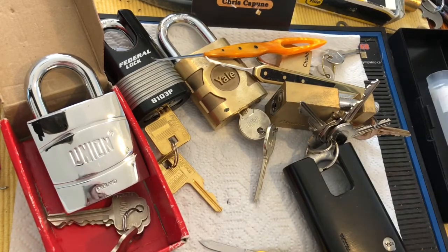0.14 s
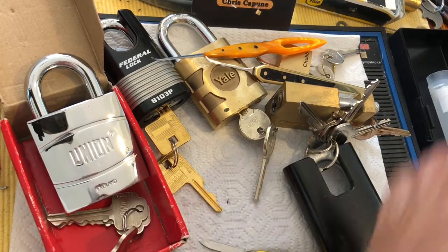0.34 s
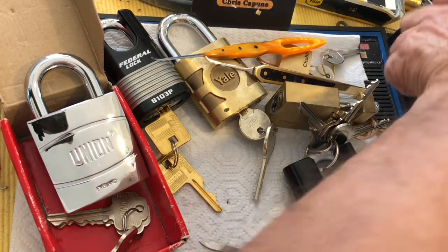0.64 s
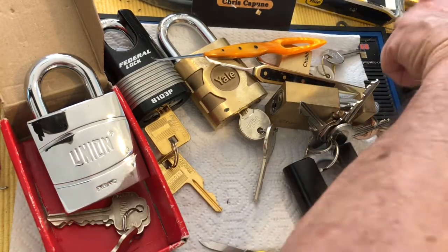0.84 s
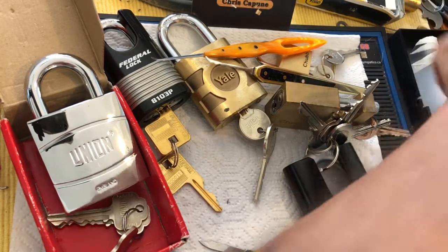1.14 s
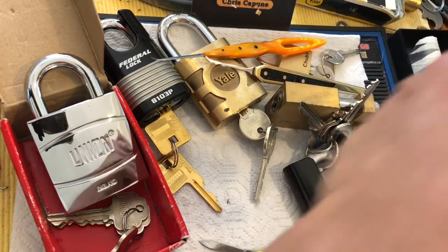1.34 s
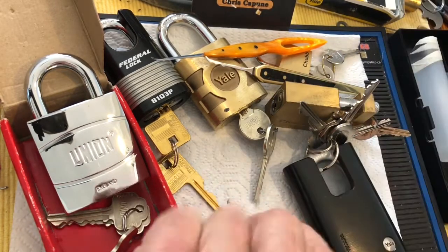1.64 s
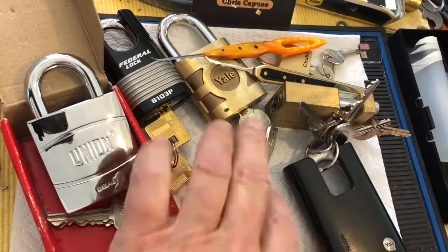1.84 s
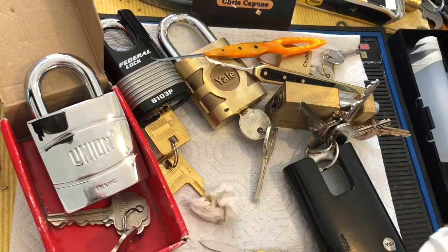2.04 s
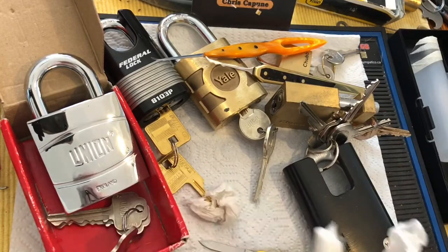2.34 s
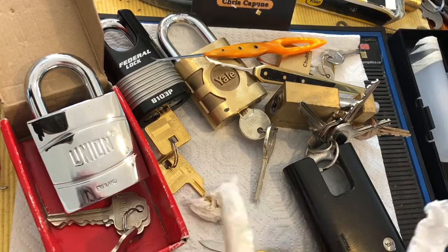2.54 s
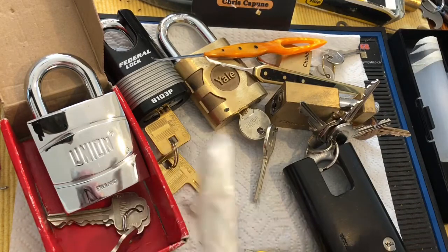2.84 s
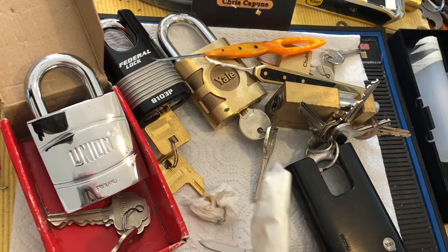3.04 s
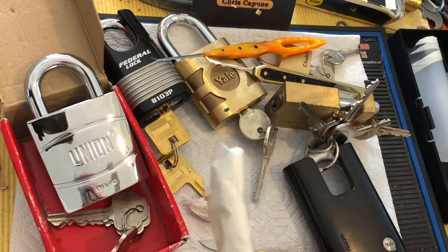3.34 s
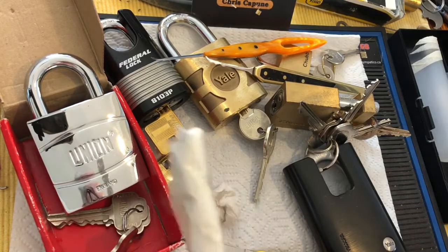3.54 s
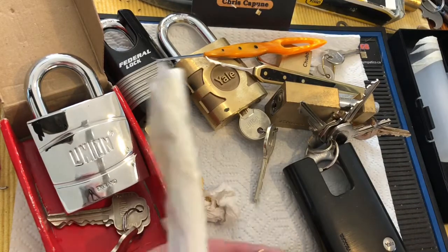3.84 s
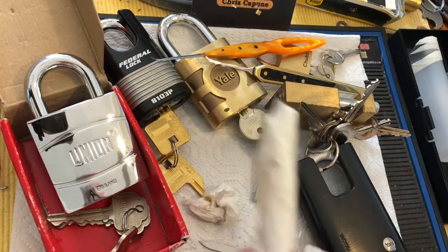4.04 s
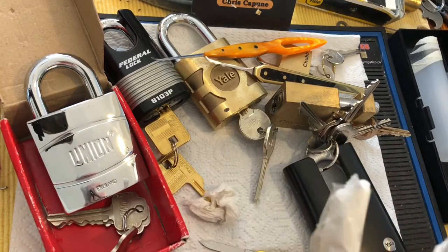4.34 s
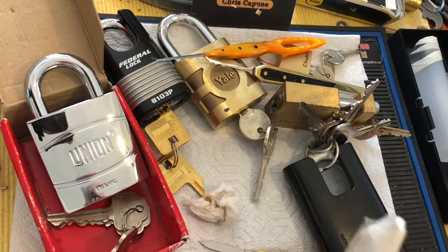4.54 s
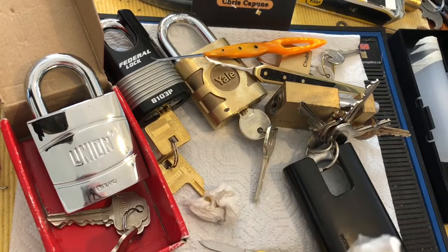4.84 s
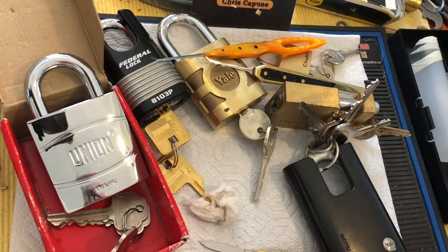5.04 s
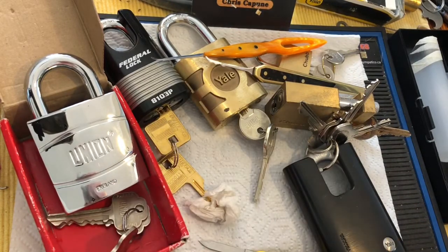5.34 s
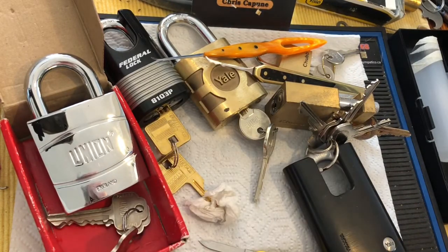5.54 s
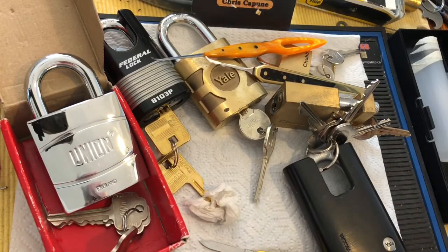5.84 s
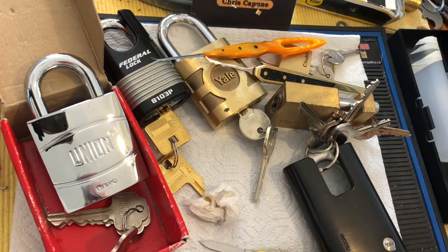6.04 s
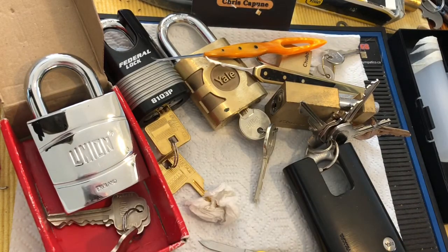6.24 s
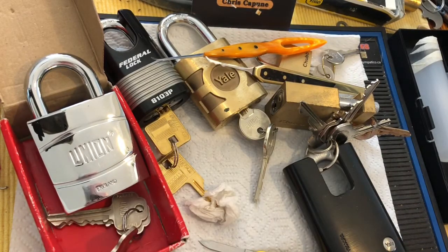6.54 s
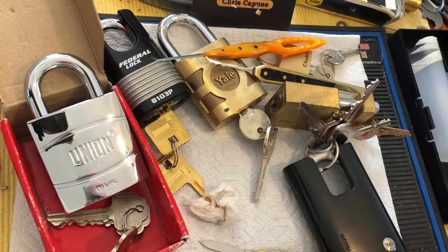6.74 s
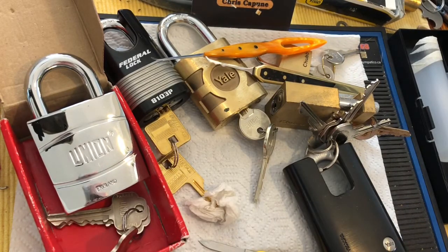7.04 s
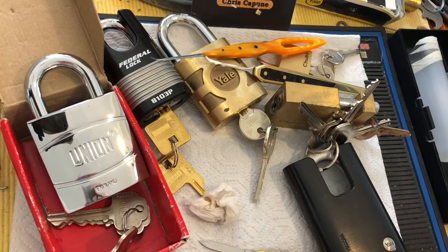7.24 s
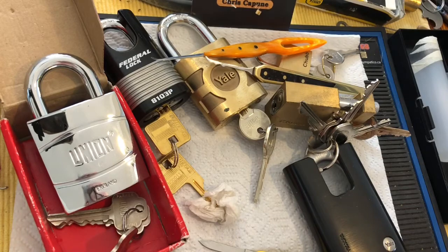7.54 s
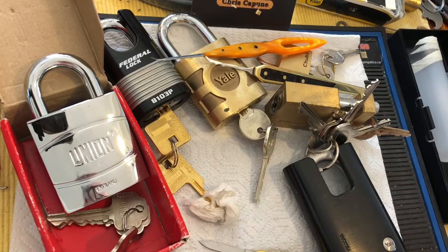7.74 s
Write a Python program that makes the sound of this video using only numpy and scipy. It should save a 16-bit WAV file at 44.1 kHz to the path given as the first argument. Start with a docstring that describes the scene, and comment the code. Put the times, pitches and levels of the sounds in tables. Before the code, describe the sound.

Close plastic clatter, then a burst of loud paper ripping and crackling, fading into dry finger rustles in a small humming room.

```python
"""A small room with a bench: close to the microphone, hands take thin paper from a plastic case.
The case clacks as ringing wall modes, a rattle, a hard crack and a hollow air note. The paper snaps as it is
torn and crumpled (short resonant bursts over fine crackle), then hisses as fingers rub and roll it (shaped noise).
A motor hums in sines that beat against the mains, over steady coloured room noise."""
import sys
import numpy as np
from scipy import signal
from scipy.fft import rfft, irfft, next_fast_len
from scipy.io import wavfile
from scipy.ndimage import uniform_filter1d, map_coordinates

SR = 44100
rng = np.random.default_rng(int(sys.argv[2]) if len(sys.argv) > 2 else 0)


def unload_audio(sound):
    """Save the sound as a 16-bit wav file, at the path given as the first command line argument."""
    columns = np.transpose(np.atleast_2d(sound))
    # keep every value between -1 and 1, then stretch to whole-number steps
    steps = np.round(np.clip(columns, -1, 1) * 32767)
    wavfile.write(sys.argv[1], SR, steps.astype(np.int16))


N = 347949


def amp(db):
    """Gain of a dB value."""
    return 10 ** (np.asarray(db) / 20)


def unit(x):
    """x at rms 1."""
    return x / np.sqrt(np.mean(x ** 2) + 1e-20)


def peaked(x):
    """x with its peak at 1."""
    return x / np.abs(x).max()


def along(points, hz):
    """Values at hz, read from (frequency, value) points on a log frequency axis."""
    point_hz, value = np.transpose(points)
    return np.interp(np.log(hz + 1), np.log(point_hz + 1), value)


def curves(rows):
    """One value per sample for each column after the time."""
    time, *columns = np.transpose(rows)
    return [np.interp(np.arange(N) / SR, time, column) for column in columns]


def wobble(rate):
    """A smooth random curve, rate knots a second."""
    knots = rng.standard_normal(int(N * rate / SR) + 4)
    return map_coordinates(knots, [np.arange(N) * rate / SR])


def filtered(x, response):
    """x times a response of frequency, with padding for the filter's tail."""
    size = next_fast_len(x.shape[-1] + 8192)
    spectrum = rfft(x, size) * response(np.fft.rfftfreq(size, 1 / SR))
    return irfft(spectrum, size)[..., :x.shape[-1]]


def coloured(x, spectrum):
    """x given a spectrum that falls away outside its points, rms 1."""
    closed = [(spectrum[0][0] * .9, -120), *spectrum, (spectrum[-1][0] * 1.01, -120)]
    return unit(filtered(x, lambda hz: amp(along(closed, hz))))


def resonance(centre_hz, width_hz):
    """A causal resonance applied twice, so that its flanks are steep."""
    return lambda hz: (1j * hz * width_hz / (centre_hz ** 2 - hz ** 2 + 1j * hz * width_hz)) ** 2


def snaps():
    """A break excites a rough ring of the buckled patch, a sharp edge and a flap; now and then a dull low knock
    sounds."""
    # creases that buckle and fibres that break: (time [s], nominal level [dB], ring frequency [Hz],
    # sharp edge [dB re ring], flap [dB re ring], decay t60 [s])
    snap_rows = [(.166, -20, 8150, -7.5, -12, 0.028), (0.216, -28.5, 3500, 4, -32, 0.015),
                 (0.4427, -37.5, 3120, -3.5, -23, 0.02), (0.924, -32, 7440, 2.5, -32, .015),
                 (1.3787, -38, 4930, -28, -29, 0.016), (1.909, -39, 5300, 12, -22, .01),
                 (2.0256, -37, 4230, -12, -10, 0.013), (2.0783, -39.5, 4330, 15, -18, 0.0074),
                 (2.1097, -13.5, 4630, -8.5, -7.5, 0.01), (2.133, -25, 5250, 4, -12, .014),
                 (2.148, -9, 6400, 0.5, -23, 0.011), (2.165, -15, 4330, -3, -6.5, 0.016),
                 (2.195, -20, 4170, 7.5, -14, 0.015), (2.199, -30, 5000, 2, -14, .01),
                 (2.215, -1.5, 5400, -6, -8.5, 0.015), (2.266, -17, 3120, 3, -10, 0.011),
                 (2.297, -32, 3100, -4.5, -19, .008), (2.381, -23, 4530, -5, -12, 0.013),
                 (2.3856, -27.5, 5000, -3.5, -20, .01), (2.3873, -17, 4130, -3.5, -14.5, 0.01),
                 (2.421, -27.5, 4000, -3, -9, 0.016), (2.472, -19, 3800, -4.5, -14, .011),
                 (2.5198, -17, 3060, 0.5, -18, 0.0082), (2.5207, -16.5, 4300, -5, -12, 0.0086),
                 (2.5244, -14, 3580, -6.5, -13, 0.018), (2.5344, -25.5, 4010, -6.5, -10, 0.014),
                 (2.549, -25, 4760, 5.5, -12, 0.017), (2.572, -27, 5500, 6.5, -21, 0.018),
                 (2.5761, -22.5, 4550, 8, -23, 0.019), (2.62, -33, 3350, 4, -6.5, 0.014),
                 (2.6967, -25, 4400, -15, -12, 0.0087), (2.8188, -25, 2900, -18.5, -6, 0.012),
                 (2.8881, -32.5, 3000, 1.5, -6, 0.016), (2.9888, -8.5, 3100, -14, -35, 0.0083),
                 (3.125, -37, 7100, 13, -22, 0.02), (3.307, -31, 3190, -9, -12, 0.011),
                 (3.8677, -23, 5470, -13.5, -24, 0.0095), (4.1075, -33.5, 5100, -10, -5.5, 0.011),
                 (4.132, -35.5, 7060, -1, -33.5, 0.0047), (4.828, -41, 5880, 13.5, -30.5, 0.0092),
                 (5.343, -34.5, 6080, 2.5, -31.5, 0.0073), (6.027, -34, 3600, 3, -11, .012),
                 (6.0535, -33, 3000, 6.5, -5, 0.019), (6.092, -40, 5500, 3, -25, .01),
                 (6.115, -34.5, 4370, 4, -3, 0.0077), (6.707, -37.5, 2200, -25, -27, 0.013),
                 (6.868, -33, 3760, 7, -30.5, 0.015), (7.1, -35, 6380, -20, -10.5, 0.028),
                 (7.649, -32, 6020, 5.5, -17, 0.0098), (7.741, -35.5, 4380, -1, -30, 0.008),
                 (7.838, -31.5, 6360, -22.5, -25, 0.011)]
    # dull low knocks among the snaps: (time [s], peak level [dB], frequency [Hz])
    pop_rows = [(2.195, -39, 910), (2.217, -34, 875), (2.523, -37, 870), (2.535, -41.5, 794),
                (2.817, -45.5, 505), (6.056, -46, 1000)]
    out, t = np.zeros(N + SR), np.arange(SR // 10) / SR

    for s, db, ring_hz, edge_db, flap_db, t60 in snap_rows:
        fade = amp(-60 * t / t60) * (1 - np.exp(-t / 0.0002))
        push = rng.standard_normal((3, len(t))) * fade
        push[:, 8] += (6, 7, 4.5)  # the instant of breaking: a spike into ring, edge and flap
        ring = peaked(filtered(push[0], resonance(ring_hz, ring_hz * 0.9)))
        edge = peaked(filtered(push[1], resonance(10000, 11000)))
        flap_hz = 1600 * np.exp(.08 * rng.standard_normal())
        flap = peaked(filtered(push[2], resonance(flap_hz, 750)))
        snap = ring + amp(edge_db) * edge + amp(flap_db) * flap
        out[round(s * SR):][:len(t)] += amp(db - 3.5) * snap

    for s, db, pop_hz in pop_rows:
        push = rng.standard_normal(len(t)) * amp(-60 * t / 0.018)
        pop = peaked(filtered(push, resonance(pop_hz, pop_hz * .7)))
        out[round(s * SR):][:len(t)] += amp(db) * pop
    return out[:N]


def crackle(count=700):
    """Small fibres break at random moments, each a tiny rough burst with its own colour and size."""
    # breaking fibres, strongest while the sheet tears: (time [s], nominal level [dB])
    fibre_levels = [(0, -61.5), (2.05, -63.5), (2.1, -42), (3.0, -47), (3.35, -57), (6, -58), (7.89, -60)]
    fibre_hz, fibre_t60_s, fibre_spread_db = 4950, 0.0073, 4
    t = np.arange(400) / SR
    when, size, pitch = rng.random((count, 3)).T
    start = (when * N).astype(int)
    size_db = curves(fibre_levels)[0][start] - fibre_spread_db * np.log(size + .02)  # a few far louder
    hz = fibre_hz * 4 ** (pitch - .5)  # spread over two octaves
    rough = uniform_filter1d(rng.standard_normal((count, len(t))), size=5, axis=1)
    fade = amp(size_db[:, None] - 60 * t / fibre_t60_s)
    bursts = rough * np.cos(2 * np.pi * hz[:, None] * t) * fade
    places = start[:, None] + np.arange(len(t))
    return np.bincount(places.ravel(), bursts.ravel(), N + len(t))[:N]


def patchy(x, patchy_db):
    """The contact wanders over the sheet, so the colour shifts in patches of time and frequency."""
    z = signal.stft(x, nperseg=256)[2]
    field = uniform_filter1d(rng.standard_normal(z.shape), size=8, axis=0)
    field = uniform_filter1d(field, size=14, axis=1)
    return signal.istft(z * amp(patchy_db * unit(field)), nperseg=256)[1][:N]


def rubbing():
    """Countless fibres catch and slip: noise whose strength jumps; one swell of it is the case's bright wash."""
    # hands resting on and shifting the paper: (time [s], hiss level [dB])
    contact_levels = [(0, -65), (.12, -68.5), (.34, -73), (.46, -71.5), (.62, -75.5), (.72, -75),
                      (1.1, -66.5), (1.5, -63), (1.76, -65), (2.05, -65.5), (3.3, -69.5), (4.05, -73),
                      (4.8, -75), (5.15, -61), (5.5, -60.5), (5.95, -65.5), (6.18, -68.5), (6.45, -71),
                      (7.3, -77), (7.89, -66)]
    # single strokes of the fingers; the one at 0.834 s is the bright wash after the case clacks:
    # (loudest time [s], hiss level [dB], rise [s], fall [s], cupped fold [dB re hiss])
    swell_rows = [(.012, -59, 0.025, 0.082, 1.5), (.174, -55, 0.022, 0.12, -30),
                  (0.834, -47, 0.014, 0.26, -33), (1.14, -57.5, 0.018, 0.14, -33),
                  (1.397, -75, 0.038, 0.14, -34), (1.66, -61, 0.034, 0.16, -28),
                  (1.868, -53.5, 0.052, 0.12, -18), (2.141, -47, 0.065, 0.2, -20),
                  (2.223, -45.5, 0.015, 0.15, -26), (2.389, -46.5, 0.076, 0.17, -25),
                  (2.528, -52, 0.058, 0.24, -25), (2.712, -54, 0.052, 0.15, -25),
                  (2.792, -45, 0.05, 0.075, -20), (2.995, -58.5, 0.16, 0.059, -30),
                  (3.141, -58, 0.074, 0.06, -30), (3.231, -56.5, 0.039, 0.21, -30),
                  (3.337, -49, 0.045, 0.028, -36), (3.49, -54, 0.17, 0.54, -36),
                  (3.66, -49.5, 0.18, 0.37, -14), (3.845, -52.5, 0.17, 0.046, -15),
                  (3.975, -53, 0.094, 0.066, -27), (4.101, -51.5, 0.011, 0.057, -16),
                  (4.19, -51, 0.06, 0.053, -28), (4.232, -55, 0.037, 0.022, -24.5),
                  (4.475, -61.5, .008, 0.31, -26), (4.564, -47, 0.014, 0.019, -15),
                  (4.615, -46.5, 0.029, 0.06, -29), (4.645, -52, 0.063, 0.041, -20),
                  (5.41, -53.5, 0.039, 0.064, -24), (5.68, -54, 0.33, 0.18, -30),
                  (5.915, -53, .1, 0.088, -30), (6.048, -54, 0.16, .12, -30),
                  (6.13, -63, 0.074, 0.033, -36), (6.492, -63.5, 0.029, 0.14, -24),
                  (6.665, -60, 0.031, 0.12, -29.5), (6.725, -51, 0.041, 0.083, -39),
                  (6.773, -51.5, 0.092, 0.022, -37), (7.005, -56.5, 0.061, 0.098, -26),
                  (7.04, -53, 0.083, 0.028, -31), (7.11, -63.5, 0.048, 0.085, -28.5),
                  (7.4, -64.5, .02, 0.051, -29), (7.58, -56, 0.12, 0.11, -25.5),
                  (7.635, -47.5, 0.08, 0.08, -19), (7.81, -55, 0.041, 0.12, -32)]
    # colour of the hiss: (frequency [Hz], relative level [dB])
    hiss_colour = [(800, -16.5), (1600, -4), (2800, -2.5), (3500, -0.5), (4800, 0), (7000, -2.5),
                   (10700, -9), (15200, -11.5), (15900, -9.5)]
    swell_db, roundness = 20.5, 1.22  # drop at the end of a rise or fall; power law of its shape
    fold_hz, fold_width_hz = 2000, 650
    # strong swells are brighter: sheen centre, level re a firm stroke, growth power, level of a firm stroke
    sheen_hz, sheen_db, sheen_grows, firm_db = 12000, -7, 1.5, -48

    t = np.arange(N) / SR
    grit = amp(0.41 * wobble(900) + 1.2 * wobble(120) + 0.25 * wobble(40))  # catches, clumps, uneven fingers
    slip = patchy(unit(grit * rng.standard_normal(N)), patchy_db=2.5)

    power, cupped = amp(2 * curves(contact_levels)[0]), np.zeros(N)
    for s, db, rise_s, fall_s, fold_db in swell_rows:
        away = np.abs(t - s) / np.where(t < s, rise_s, fall_s)
        swell = amp(2 * (db - swell_db * away ** roundness))  # doubled dB: swells add as power
        power = power + swell
        cupped = cupped + amp(2 * fold_db) * swell
    strength = np.sqrt(power)

    hiss = strength * coloured(slip, hiss_colour)
    fold = np.sqrt(cupped) * unit(filtered(slip, resonance(fold_hz, fold_width_hz)))
    bright = coloured(filtered(slip, resonance(sheen_hz, sheen_hz)), hiss_colour[2:])
    sheen = amp(sheen_db + firm_db) * (strength / amp(firm_db)) ** sheen_grows * bright
    return hiss + sheen + fold


def case():
    """Every knock rings the plastic walls at new strengths, the air inside, and shakes what lies there."""
    # the case is knocked and its lid bounces: (time [s], nominal level [dB], wall ring [dB re rattle],
    # hollow note [dB re nominal level], rattle t60 [s])
    clack_rows = [(0.735, -47.5, 10.5, -5.5, 0.015), (0.827, -0.5, -6.5, -25, 0.03),
                  (0.87, -30, 9, -10, 0.04), (0.9333, -16.5, -11, -31, 0.059),
                  (0.9367, -9, -1.5, -16.5, 0.048), (0.968, -11, -10, -9.5, 0.043),
                  (0.995, -23, -0.5, -6, 0.037)]
    # wall modes: (nominal frequency [Hz], relative level [dB], decay t60 [s])
    wall_modes = [(327, -14, 0.07), (424, -7, 0.046), (634, -2.5, 0.051), (943, -6.5, .05),
                  (1054, -10.5, 0.033), (1300, -0.5, 0.045), (1588, -4.5, 0.018), (2342, -1.5, 0.04),
                  (2620, -3, 0.025), (2740, -5, 0.032), (3138, -6.5, 0.022), (3640, -8.5, 0.019),
                  (4370, -11, .02), (5340, -13.5, 0.026)]
    # colour of the loose rattle: (frequency [Hz], relative level [dB])
    rattle_colour = [(150, -46), (250, -29.5), (1320, -1), (1660, -13), (2050, -5.5), (2280, -12),
                     (2530, -5.5), (4800, -12.5), (5800, -16), (10100, -16.5), (16500, -30)]
    # the air under the lid: (frequency [Hz], width [Hz], t60 of its noise drive [s])
    lid_air = (795, 75, 0.07)
    waver = 0.1  # phase drift of the wall modes, radians a sample
    thin_hz = 170  # the small case radiates little below this
    out, t = np.zeros(N + SR), np.arange(SR // 3) / SR
    hollow_hz, width_hz, drive_t60 = lid_air

    for s, db, ring_db, hollow_db, t60 in clack_rows:
        chance = rng.standard_normal((len(wall_modes), 2))
        ring = np.zeros(len(t))
        for (hz, level, mode_t60), (luck, detune) in zip(wall_modes, chance):
            drift = waver * np.cumsum(rng.standard_normal(len(t)))
            tone = np.sin(2 * np.pi * hz * (1 + 0.0076 * detune) * t + drift)
            fade = amp(level + np.clip(2.0 * luck, -4, 4) - 60 * t / mode_t60)
            ring += fade * tone * (1 - np.exp(-t * hz / 2.2))  # low modes take longer to build

        rattle = coloured(rng.standard_normal(len(t)), rattle_colour) * amp(-60 * t / t60)

        shaken = rng.standard_normal(len(t)) * amp(-60 * t / drive_t60)
        shaken[:40] += 3 * np.hanning(40)  # the lid pushes the air once
        hollow = peaked(filtered(shaken, resonance(hollow_hz, width_hz)))  # builds up and wavers

        contact = rng.standard_normal(len(t)) * amp(-60 * t / 0.013)
        contact[24] += 5  # the hard edge lands
        crack = 2.0 * peaked(filtered(contact, resonance(3700, 3300)))

        onset = 1 - np.exp(-t / 0.0009)
        knock = amp(-6.5) * (amp(ring_db) * ring + rattle + crack) * onset
        out[round(s * SR):][:len(t)] += amp(db) * (knock + amp(hollow_db) * hollow)
    return filtered(out[:N], lambda hz: (1j * hz / (thin_hz + 1j * hz)) ** 2)


def motor():
    """Twice the shaft speed lies just under twice the mains, so the hum throbs at the slip between them."""
    # shaft harmonics: (multiple of the shaft speed, mean level [dB rms])
    shaft_orders = [(4, -67.5), (5, -73)]
    # the eighth order comes in: (time [s], mean level [dB rms])
    whine_levels = [(0, -88), (3.2, -88), (3.75, -68.5), (7.89, -68.5)]
    shaft_hz, slip_hz, beat_dip_s = 58.9, 2.17, .58  # the two hums oppose each other at the dip
    t = np.arange(N) / SR
    turn = 2 * np.pi * (shaft_hz * t + .004 * wobble(3))  # the speed is slightly unsteady
    slip = 2 * np.pi * slip_hz * (t - beat_dip_s)
    shaft_hum = amp(-57.5) * np.sin(2 * turn)
    mains_hum = amp(-62) * np.sin(4 * np.pi * shaft_hz * t + slip)
    hum = shaft_hum - mains_hum
    for order, db in shaft_orders:
        hum = hum + amp(db + 2.5 * wobble(3)) * np.sin(order * turn)
    whine = amp(curves(whine_levels)[0] + .6 * wobble(1.4)) * np.sin(8 * turn)
    return np.sqrt(2) * (hum + whine)  # sine peak from rms


def room(x):
    """Each frequency of the room's answer, a noise tail, dies at its own speed."""
    # reverberation: (frequency [Hz], decay t60 [s])
    room_decay = [(300, 0.27), (800, 0.36), (3000, 0.33), (12000, 0.17), (15500, 0.098), (16200, 0.0022)]
    hz, t, z = signal.stft(rng.standard_normal(SR // 2), SR, nperseg=256)
    fade = amp(-60 * t / along(room_decay, hz)[:, None])
    tail = signal.istft(z * fade, SR, nperseg=256)[1]
    late = np.pad(x, (150, 0))  # the answer starts 150 samples after the direct sound
    return signal.fftconvolve(late, tail / np.linalg.norm(tail))[:N]


def room_noise():
    """Steady noise, strongest in the lows, fills the room."""
    # colour of the room noise: (frequency [Hz], relative level [dB])
    air_colour = [(24, -38.5), (33, -39.5), (42, -11), (70, -13.5), (130, -8.5), (240, -11), (400, -20),
                  (500, -20), (700, -25.5), (1300, -27.5), (2200, -34), (3000, -36), (5000, -51),
                  (15900, -64.5)]
    return amp(-54.5) * coloured(rng.standard_normal(N), air_colour)


def scene():
    """Hands near, with the room's answer to paper and case; motor and room noise all round."""
    paper, box = snaps() + crackle(), case()
    echo = amp(-21) * room(paper) + amp(-12.5) * room(box)
    return (paper + rubbing() + box + echo + motor() + room_noise())[None]


def record(dry):
    """The hardest peaks are rounded off; nothing is kept above the band limit."""
    overload, top_hz = .95, 16900  # ceiling of the rounding (full scale = 1); band limit
    soft = dry / (1 + np.abs(dry / overload) ** 4) ** (1 / 4)
    return filtered(soft, lambda hz: hz < top_hz)


dry = scene()
out = record(dry)
unload_audio(out)
```